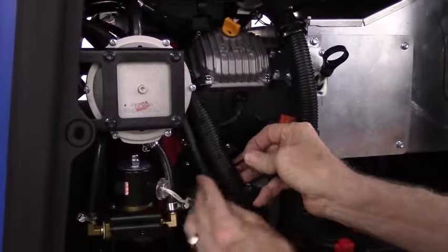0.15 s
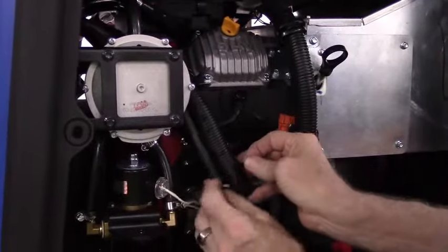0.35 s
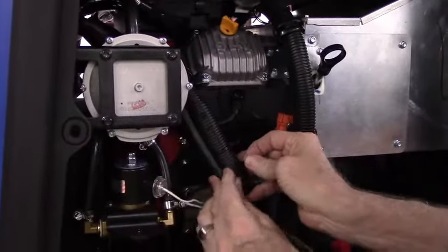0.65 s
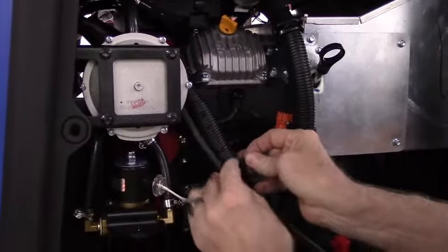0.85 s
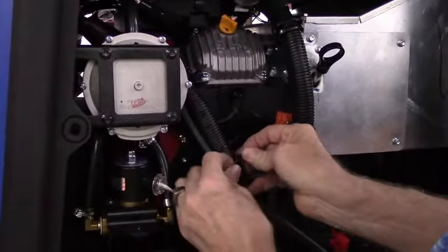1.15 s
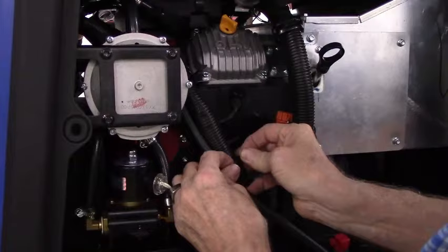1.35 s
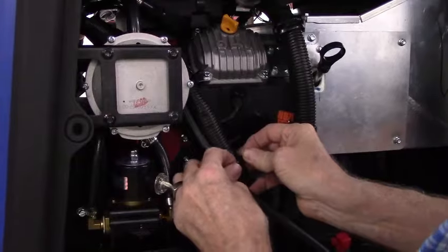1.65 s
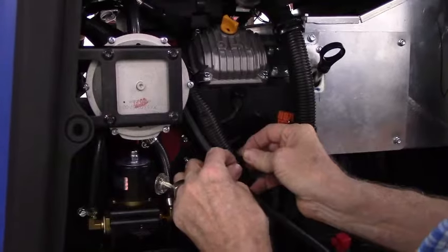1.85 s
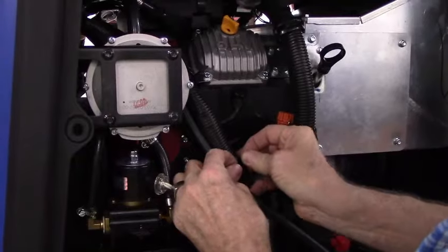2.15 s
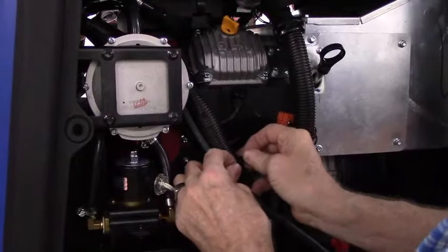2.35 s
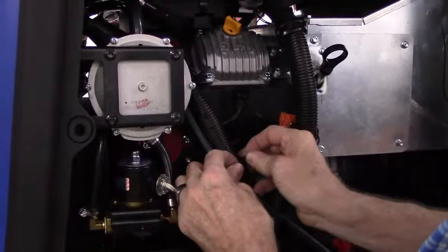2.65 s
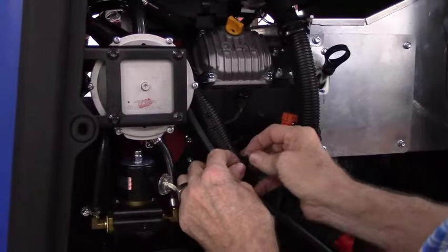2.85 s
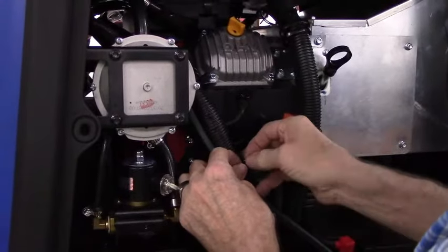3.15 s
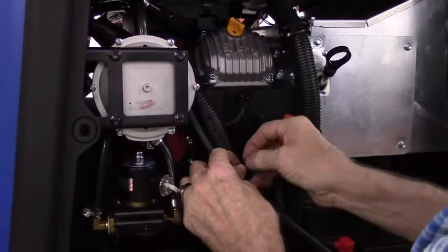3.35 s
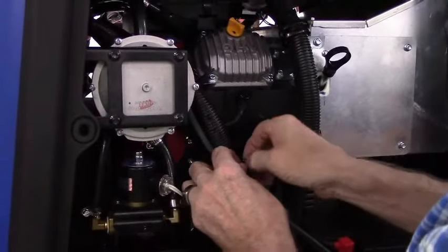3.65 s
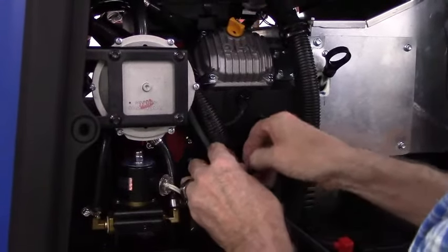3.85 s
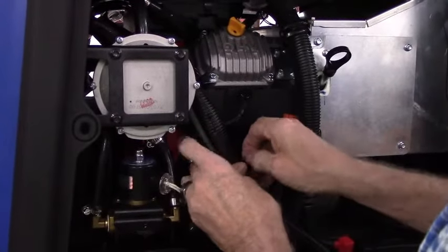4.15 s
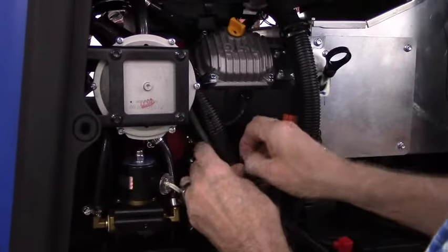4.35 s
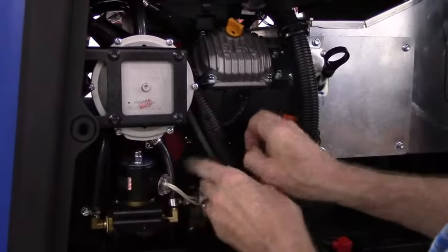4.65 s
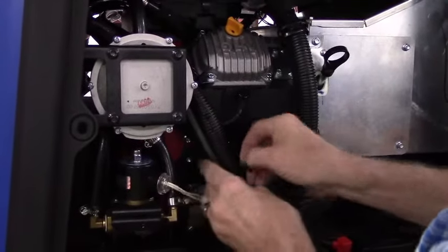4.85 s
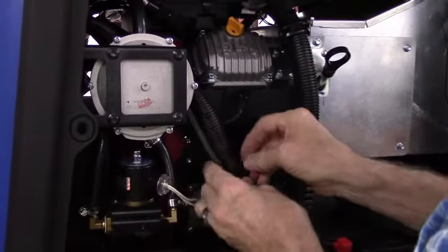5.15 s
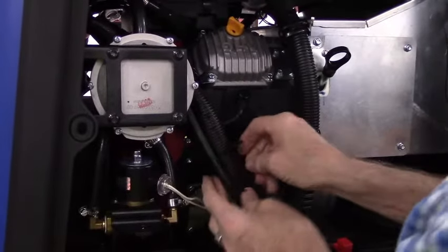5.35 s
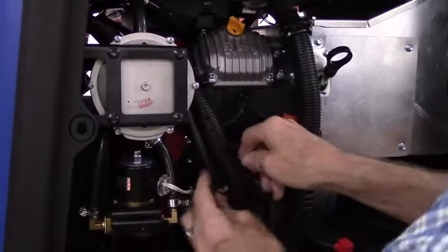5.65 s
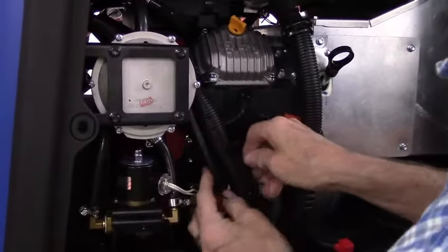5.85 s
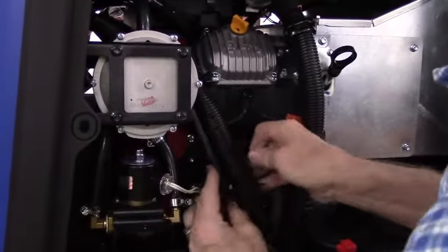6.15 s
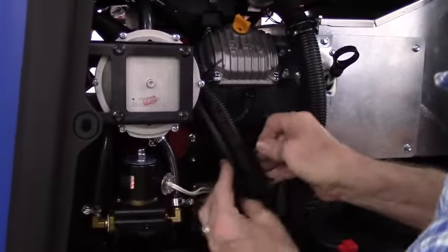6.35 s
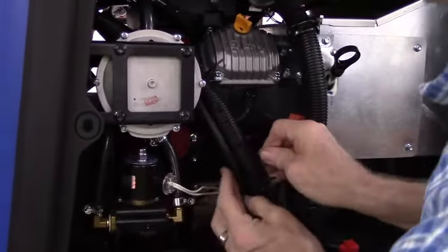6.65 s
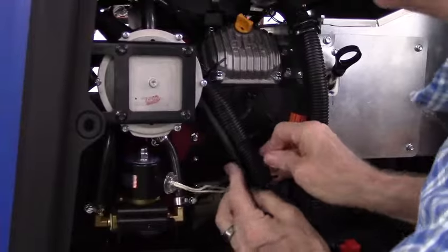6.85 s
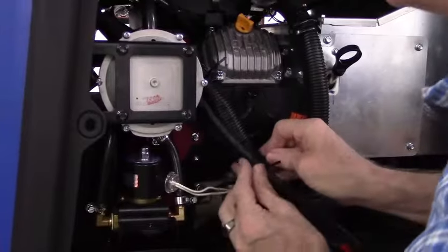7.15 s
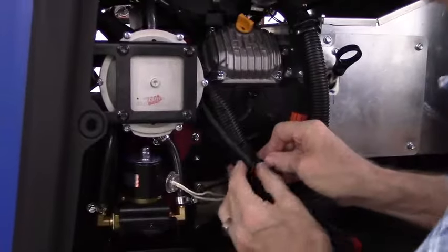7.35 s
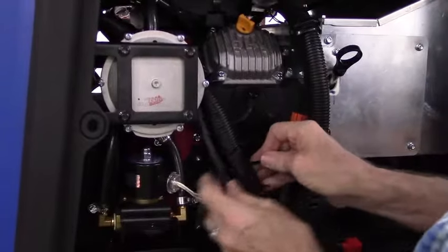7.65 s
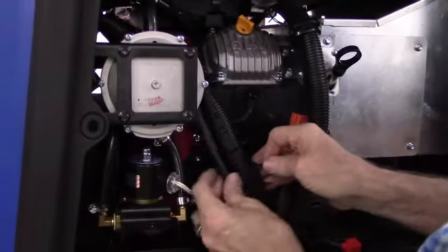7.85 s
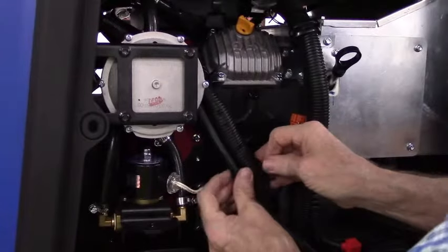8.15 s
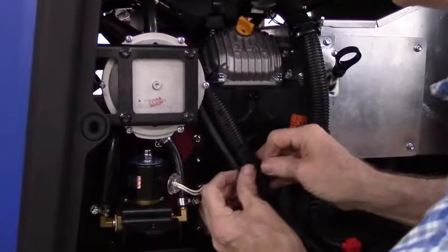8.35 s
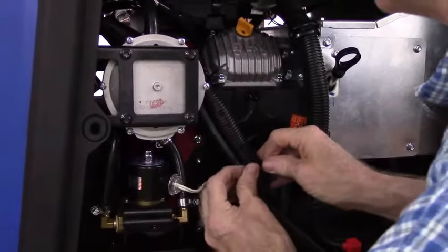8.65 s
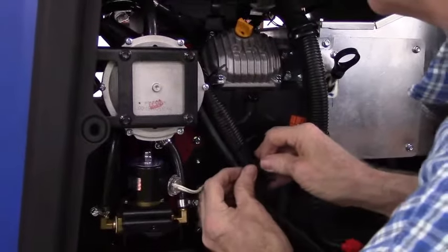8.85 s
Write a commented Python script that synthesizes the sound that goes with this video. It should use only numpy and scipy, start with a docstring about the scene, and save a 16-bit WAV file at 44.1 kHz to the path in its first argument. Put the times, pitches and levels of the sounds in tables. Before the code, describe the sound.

Close handling of thin toothed plastic: sharp snaps, sparse small clicks, then a busy flurry of knocks, scratchy scuffs and falling hose thumps.

```python
"""In a quiet workshop, two hands thread nylon zip ties round a ribbed hose and wiring in an engine bay.
The stiff strap snaps, ticks and knocks: short noise bursts and fading tones. Its pulls and scuffs are
filtered stick-slip noise. The knocked hose answers with a thump whose low waves arrive last, so it
falls in pitch. Sounds are close and nearly mono, with a short echo, steady air and a faint high whine."""
import sys
import numpy as np
from scipy import signal
from scipy.fft import rfft, irfft, next_fast_len
from scipy.io import wavfile

SR = 44100
rng = np.random.default_rng(int(sys.argv[2]) if len(sys.argv) > 2 else 0)


def put_to_file(sound):
    """Save the sound as 16-bit audio at rate SR, in the file named by the first command-line argument."""
    columns = np.atleast_2d(sound).T  # one column per channel
    safe = np.clip(columns, -1, 1)
    whole_steps = np.round(safe * 32767)
    wavfile.write(sys.argv[1], SR, whole_steps.astype(np.int16))


N = 397341
TIME = np.arange(N) / SR   # seconds

# In all tables of events and ringing parts, levels come before any gain set in the functions.
# Steady room noise: pitch_hz, relative level_db
AIR_SPECTRUM = [(15, -34), (25, -32), (72, -12.5), (223, -1.5), (326, -3), (363, -3.5), (695, -7.5),
                (1160, -13), (1440, -13), (1650, -15), (2990, -19.5), (3340, -20), (5730, -23.5),
                (6380, -23.5), (16000, -37)]
# Stereo width of that noise: pitch_hz, side_against_mid_db
AIR_WIDTH = [(30, 1), (70, -4), (130, -7.5), (500, -4), (1500, -5), (6000, -9.5), (12000, -25)]
# The workshop's echo: pitch_hz, time_to_fall_60_db_s, level_db
ROOM_ECHO = [(150, 0.64, -2), (297, 0.59, -9.5), (666, 0.35, -8), (1250, 0.079, -17), (3150, 0.69, -13.5),
             (7160, 0.23, -18), (14000, 0.22, -39)]
# Hands bump the hose softly: peak_s, level_db, pitch_hz
HOSE_BUMPS = [(2.166, -50, 250), (2.216, -44.5, 244), (5.526, -42.5, 220), (5.565, -40.5, 255),
              (5.598, -44, 142), (6.015, -39, 240), (6.441, -45, 208), (6.857, -47, 245), (7.049, -46, 285),
              (7.085, -52, 135), (7.169, -47.5, 522)]
# The hose is plucked: start_s, level_db, contact_db, rib_rattle_db (the last two relative to the pluck)
HOSE_PLUCKS = [(4.7161, -21.5, -29, -26), (5.3086, -22.5, -29, -20), (7.6625, -15.5, -9, -13)]
# Bending waves of the hose, low ones later: middle pitch_hz, level_db, arrival_s, rise_s (peak after two)
HOSE_WAVES = [(1040, -1, 0.00042, 0.00043), (1450, -22, 0.00019, 0.00094), (714, 0.5, 0.00367, 0.0012),
              (515, -4.5, 0.00471, 0.0019), (332, -6.5, 0.00777, 0.0039), (252, -3, 0.00907, 0.0065),
              (199, -21, 0.0095, 0.016)]
# The taut strap hums as it drags: time_s, level_db
DRAG_LEVEL = [(0, -37), (.024, -47), (.04, -74), (.15, -70), (.18, -48), (.21, -54), (.25, -64), (.42, -78),
              (.5, -100)]
# Teeth chatter over an edge and ring the taut strap:
# start_s, length_s, level_db, average teeth_per_s, ring_hz
TOOTH_CHATTERS = [(.165, .05, -60.5, 140, 2720), (0.271, 0.08, -61, 71, 2800), (.28, .07, -68, 170, 3380),
                  (1.026, 0.076, -62.5, 114, 1760), (3.253, 0.043, -50.5, 350, 1810),
                  (3.608, 0.039, -51, 300, 1580), (4.598, 0.089, -56, 450, 3770),
                  (4.676, .045, -57, 700, 8000), (5.687, 0.052, -49, 250, 1450)]
# The strap is pulled harder and harder, then stops: start_s, length_s, rib_rasp_db, tooth_hiss_db, edge_bite_db
STRAP_PULLS = [(0, 0.053, -47.5, -45.5, -51), (.11, 0.12, -54, -57, -67), (.245, 0.069, -57, -53.5, -62),
               (.315, 0.11, -58, -56.5, -67), (2.15, 0.082, -56, -61, -56.5), (3.125, 0.026, -55, -62, -58),
               (3.21, 0.032, -53, -57, -59), (3.238, 0.033, -46, -47.5, -58),
               (3.345, 0.18, -58.5, -60.5, -63), (4.42, 0.078, -61, -64, -65),
               (4.675, 0.049, -62, -46, -64), (4.88, 0.04, -49, -52, -58), (4.975, 0.021, -54, -49.5, -52),
               (5.135, 0.13, -51, -61.5, -63), (5.237, 0.0087, -64, -57, -55),
               (5.298, 0.0074, -39.5, -56, -61), (5.46, 0.056, -51, -51, -59),
               (5.578, 0.022, -52, -54, -56), (5.686, 0.02, -46.5, -59, -55), (5.808, 0.049, -53, -55, -68),
               (6.33, 0.12, -52.5, -49.5, -59), (6.848, 0.038, -49, -56.5, -60),
               (6.985, 0.044, -50.5, -57, -60), (7.155, 0.025, -62, -54, -57), (7.28, 0.11, -62, -63, -67),
               (7.435, 0.08, -62, -58.5, -64), (7.555, 0.096, -49.5, -59.5, -73),
               (7.715, 0.078, -52, -57.5, -70), (7.885, 0.078, -55.5, -68, -62)]
# A finger or the strap's tail skids off and comes to rest:
# start_s, length_s, rib_rasp_db, tooth_hiss_db, edge_bite_db
STRAP_SCUFFS = [(.035, 0.58, -48, -62.5, -53.5), (.42, 0.2, -52.5, -60, -61), (1.02, 0.25, -54, -63, -63),
                (2.228, 0.076, -49, -60, -56), (3.28, 0.071, -46.5, -54, -58),
                (3.602, 0.087, -45.5, -47.5, -51), (3.634, 0.33, -52.5, -62.5, -60),
                (3.796, 0.17, -53.5, -57.5, -62), (4.59, 0.43, -42, -52.5, -56),
                (4.777, 0.065, -37, -43.5, -44), (5.066, 0.065, -55, -60, -65),
                (5.365, 0.27, -53.5, -60.5, -64), (5.52, 0.22, -52.5, -59.5, -65),
                (5.65, 0.055, -66, -72, -63), (5.735, 0.57, -53.5, -66, -64),
                (5.96, 0.12, -44.5, -55, -52.5), (6.2, 0.28, -53.5, -58, -58),
                (6.455, 0.097, -50, -53.5, -70), (7.8, 0.18, -50.5, -60, -68),
                (8.018, 0.055, -44, -56, -49)]
# Sound colour of the ribs, the teeth and the scraping, resonating edge: pitch_hz, relative level_db
RIB_COLOUR = [(50, -50), (300, -3.5), (700, -4.5), (950, 4), (1300, 6.5), (1900, -6), (2350, -5.5),
              (3100, -10), (3700, -15), (4400, -20), (7000, -49)]
TOOTH_COLOUR = [(100, -66), (2000, -16), (3500, -3.5), (5000, -3), (6500, 2), (8000, 0), (10500, -4),
                (13000, -11.5), (16000, -22)]
EDGE_COLOUR = [(600, -54), (1500, -29), (1820, 7.5), (2350, -10), (2750, 1), (3250, -2), (4000, -33),
               (7000, -45)]
# Ringing tones of sleeve, pawl and strap, before the variation of each hit:
# pitch_hz, level_db, time_to_fall_60_db_s
SLEEVE_MODES = [(866, -2, 0.014), (973, 3.5, 0.0087), (1270, 0, 0.017), (1445, -5.5, 0.029),
                (1837, -8, 0.047), (2000, -4, 0.018), (2820, -6.5, 0.036), (3250, -1.5, 0.025),
                (3580, 2, 0.0069), (5890, -1, 0.027), (7600, 13.5, 0.0053), (9140, 0.5, 0.013)]
PAWL_MODES = [(1010, -3, 0.0085), (1200, 3.5, 0.0044), (1780, 0.5, 0.0063), (1930, -5, 0.018),
              (2760, -9, 0.01), (2940, 3.5, 0.01), (3400, 1, 0.0044), (5270, -6, 0.0096),
              (6180, 4.5, 0.0026), (7600, 2, 0.015), (10200, -6, 0.0066)]
STRAP_MODES = [(868, 8, 0.025), (1054, 8.5, 0.018), (1650, 9.5, 0.0097), (2260, 3, 0.016),
               (2600, 0.5, 0.017), (3670, -0.5, 0.0065), (4560, -4.5, 0.012), (5940, -1.5, 0.0062),
               (7230, -5, 0.0098), (9170, -10, 0.013), (10900, -13, 0.011)]
# The tie's head and teeth knock on the ribbed sleeve: start_s, body_db, edge_db, crack_db
SLEEVE_KNOCKS = [(0.8072, -53, -52, -80), (1.3734, -49, -56, -71), (2.157, -48, -56, -60),
                 (2.1955, -46, -47.5, -55), (2.2165, -43, -44, -53), (2.2215, -50, -46, -57),
                 (3.144, -54, -54, -65), (3.488, -46, -62, -73), (3.602, -44, -41, -52),
                 (2.9812, -49.5, -69, -73), (3.4681, -49, -48, -51), (3.508, -49, -49, -52.5),
                 (3.7724, -60, -55, -56), (3.7954, -44.5, -53, -57), (4.0598, -48.5, -67, -67),
                 (4.1865, -50.5, -60, -65), (4.5807, -26.5, -29, -38), (4.5858, -17, -18, -23),
                 (4.5912, -34, -28, -44), (4.6595, -48, -50, -44), (4.6622, -33, -51, -52),
                 (4.6685, -44, -56, -60), (4.7707, -28, -47, -46), (4.805, -37.5, -49, -47),
                 (5.068, -55, -49.5, -61), (5.1638, -48, -52, -58), (5.3603, -37, -40, -50.5),
                 (5.515, -36.5, -47.5, -48), (5.5855, -42, -58, -63), (5.6078, -45, -49, -44.5),
                 (5.624, -40.5, -58, -66), (5.639, -44, -48, -66), (5.6901, -53, -45, -58),
                 (5.703, -50, -48, -71), (5.7272, -36, -43.5, -47.5), (5.8115, -43, -63, -66),
                 (5.8198, -37, -55, -64), (5.8248, -36, -55, -55), (5.8315, -32.5, -54, -53),
                 (5.9046, -45, -56, -51), (6.3215, -48.5, -57, -77), (6.5466, -46, -42.5, -60),
                 (6.7721, -41.5, -54, -60), (7.0116, -49, -55, -42), (7.7385, -54, -50, -69),
                 (7.8045, -44, -68, -65), (7.915, -49, -56, -52), (8.4468, -52, -52.5, -55.5),
                 (8.4762, -54, -51.5, -56)]
# Teeth skip past the tie's pawl: start_s, body_db, edge_db, crack_db, free_length_hz
PAWL_TICKS = [(1.0072, -65, -45.5, -42.5, 5850), (1.031, -67, -59, -66, 3140),
              (1.1409, -74, -77, -52, 8000), (2.1668, -58, -50, -59, 2940), (3.74, -51, -63, -57, 6870),
              (3.811, -62, -67, -58, 5700), (4.023, -70, -75, -60.5, 8060), (4.4265, -73, -59.5, -62, 6060),
              (4.5437, -66, -70, -54.5, 8580), (4.849, -64, -71, -59, 7400), (4.9685, -59, -66, -60, 4760),
              (5.425, -68, -66, -61, 7000), (5.8445, -60, -68, -49, 7400), (6.2555, -50, -55, -54, 2530),
              (4.781, -56, -39, -47, 3430), (5.9575, -58, -43, -50.5, 6840), (5.961, -58, -53, -45.5, 3300),
              (6.2024, -70, -78, -53, 6800), (6.27, -60, -60, -49.5, 7100), (7.2031, -62, -52, -53, 2300),
              (7.3054, -57, -62, -46, 7360), (7.3418, -72, -69, -53, 9920), (7.3673, -42, -33, -39, 2700),
              (7.4945, -64, -60, -53, 2420), (7.637, -70, -68, -50.5, 8000), (4.7965, -39, -53, -48, 7200),
              (4.931, -65, -46.5, -59, 3000), (4.9925, -60, -51, -53.5, 7500), (5.248, -61, -52, -58, 4600),
              (8.6843, -76, -52.5, -55.5, 1890)]
# The strap flicks free: start_s, body_db, edge_db, crack_db, free_length_hz
STRAP_SNAPS = [(0.0256, -23, -14.5, -34.5, 1730), (0.2355, -46, -60, -66, 900),
               (0.4136, -21.5, -21.5, -27.5, 886), (0.7024, -56, -50.5, -57, 2160),
               (1.1803, -49, -51.5, -53.5, 1130), (1.8346, -44.5, -40.5, -38, 1880),
               (2.1356, -42.5, -57, -52, 990), (2.5771, -51, -53, -63, 1220),
               (2.821, -41, -48, -42.5, 1260), (3.0371, -43, -62, -65, 930),
               (3.0412, -47.5, -54, -60, 1410), (3.2441, -38.5, -52, -43, 1770),
               (3.6073, -40, -44, -50, 1390), (5.6482, -33.5, -52, -62, 895),
               (6.6673, -43.5, -50, -59, 1500), (7.953, -68, -45, -54, 2350),
               (8.0158, -52, -42.5, -44.5, 1410)]

AIR_DB = -59.5   # middle channel
WHINE_HZ, WHINE_DB = 5500, -77
WHINE_PULSES_PER_S, WHINE_FIRST_S = 7.465, .065   # middle of an early pulse
BODY_TOP_HZ, EDGE_TOP_HZ = 1400, 4500   # limits between a click's body, edge and crack
LIGHT_DAMPING = .45   # share of its ring time left to a part that the fingers still hold
SWELL_DB = 4   # a pull's growth from start to end, on top of getting up to speed
GRAB_SHARE, STOP_S = 0.16, 0.0081   # share of a pull spent getting up to speed; fade time of its stop
SKID_S, SKID_LOSS_DB = 0.0011, 20.5   # a scuff's attack, and its loss over its length
# Fingers never lie quite still, and rub more while the hands shift along the hose.
RESTING_RIB_DB, RESTING_TOOTH_DB, RESTING_EDGE_DB = -74, -79.5, -87   # outside the busy stretch
BUSY_FROM_S, BUSY_TO_S, BUSY_DB = 4.42, 8.08, 9.5
CUTOFF_HZ = 16200


def from_db(db):
    """Turn decibels into a plain multiplier."""
    return 10 ** (np.asarray(db) / 20)


def rms_one(x):
    """Scale a sound to an average (rms) level of one."""
    return x / np.sqrt(np.mean(x ** 2) + 1e-20)


def unit_energy(x):
    """Scale a short sound so that its squares add up to one."""
    return x / np.sqrt(np.sum(x ** 2) + 1e-20)


def at_hz(points, hz, column=1):
    """Read a table column between its points, on a log-frequency axis."""
    points = np.array(points)
    return np.interp(np.log(np.maximum(hz, 1)), np.log(points[:, 0]), points[:, column])


def band(x, hz, kind="band", order=2):
    """Keep only part of the spectrum."""
    return signal.sosfilt(signal.butter(order, hz, kind, fs=SR, output="sos"), x)


def colour(x, points):
    """Shape the spectrum of a steady sound with a table."""
    size = next_fast_len(N)
    gain = from_db(at_hz(points, np.fft.rfftfreq(size, 1 / SR)))
    return irfft(rfft(x, size) * gain, size)[:N]


def add(out, s, sound):
    """Mix a short sound in at time s."""
    start = max(round(s * SR), 0)
    out[start:start + len(sound)] += sound[:N - start]


def fading(x, fade_s):
    """Let every pulse in x die away smoothly."""
    return signal.lfilter([1], [1, -np.exp(-1 / (fade_s * SR))], x + 1e-18)


def room_air():
    """Steady ventilation noise, widest in the bass, and a thin electrical whine that pulses on and off."""
    mid, side = (from_db(AIR_DB) * rms_one(colour(white, AIR_SPECTRUM))
                 for white in rng.standard_normal((2, N)))
    pulse_phase = 2 * np.pi * WHINE_PULSES_PER_S * (TIME - WHINE_FIRST_S)
    on = np.clip(.5 + 2 * np.cos(pulse_phase), 0, 1)
    whine = on * from_db(WHINE_DB) * np.sqrt(2) * np.sin(2 * np.pi * WHINE_HZ * TIME)
    return mid + whine + colour(side, AIR_WIDTH) * [[1], [-1]]


def workshop_echo(x, build_s=0.0006):
    """A diffuse tail of fading noise that builds up quickly, each octave dying at its own rate."""
    t, tail = TIME[:SR * 3 // 4], 0
    for hz in 125 * 2. ** np.arange(8):
        octave = [hz / np.sqrt(2), min(hz * np.sqrt(2), SR * 4 / 9)]
        noise = band(rng.standard_normal(len(t)), octave)
        build_up = 1 - np.exp(-(t / build_s) ** 2)
        fade = unit_energy(from_db(-60 * t / at_hz(ROOM_ECHO, hz)) * build_up)
        tail = tail + noise * fade * from_db(at_hz(ROOM_ECHO, hz, column=2))
    return signal.fftconvolve(x, tail)[:N]


def hose_bumps(rise_s=0.00408, skin_db=-9, gain_db=22):
    """Soft skin on rubber gives a short dull thud, pitched by where the hose is held."""
    out, t = np.zeros(N), TIME[:SR // 8]
    for peak_s, bump_db, hz in HOSE_BUMPS:
        skin = rms_one(band(rng.standard_normal(len(t)), [hz / 2, hz * 2]))
        tone = np.sin(2 * np.pi * hz * t)
        thud = (tone + from_db(skin_db) * skin) * t ** 2 * np.exp(-t / rise_s)
        add(out, peak_s - 2 * rise_s, from_db(bump_db + gain_db) * unit_energy(thud))
    return out


def rib_rattle(t, per_s=110, decay_s=0.084, tap_s=0.0018):
    """The swinging hose taps its ribs against the wiring, unevenly and ever more weakly."""
    taps = (rng.random(len(t)) < per_s / SR) * rng.uniform(0.47, 1, len(t))
    bursts = fading(taps, tap_s) * np.exp(-t / decay_s) * rng.standard_normal(len(t))
    return unit_energy(band(bursts, [520, 1700]))


def hose_wave(t, hz, arrival_s, rise_s, broken=0.52):
    """One bending wave swells and fades; ribs rubbing on the wiring break it up."""
    age = np.maximum(t - arrival_s, 0)
    varied_hz = hz * (1 + 0.045 * rng.standard_normal())
    wave = age ** 2 * np.exp(-age / rise_s) * np.sin(2 * np.pi * varied_hz * age)
    rub = rms_one(band(rng.standard_normal(len(t)), [hz / 20, hz / 4]))
    return unit_energy(band(wave * (1 + broken * rub), hz / 2, "high", order=3))


def hose_plucks(grit_s=0.018, grit_db=-7, contact_s=0.0027, gain_db=14):
    """A sharp contact sends waves along the hose; the slow low ones come last, while the ribs rattle."""
    out, t = np.zeros(N), TIME[:SR // 6]
    for s, pluck_db, contact_db, rattle_db in HOSE_PLUCKS:
        grit, touch = rng.standard_normal((2, len(t)))
        contact = band(touch * np.exp(-t / contact_s), [750, 2500], order=3)
        grit = band(grit * np.sqrt(t) * np.exp(-t / grit_s), [230, 1300], order=3)
        pluck = from_db(contact_db) * unit_energy(contact) + from_db(grit_db) * unit_energy(grit)
        pluck += from_db(rattle_db) * rib_rattle(t)
        for hz, wave_db, arrival_s, rise_s in HOSE_WAVES:
            pluck += from_db(wave_db) * hose_wave(t, hz, arrival_s, rise_s)
        add(out, s, from_db(pluck_db + gain_db) * pluck)
    return out


def stick_slip(per_s, uneven_db, smooth_db):
    """Stick and slip: tiny uneven catches over smooth friction."""
    sizes = from_db(uneven_db * np.minimum(rng.exponential(1, N), 3)) * rng.choice([-1, 1], N)
    catches = sizes * (rng.random(N) < per_s / SR)
    return rms_one(catches) + from_db(smooth_db) * rng.standard_normal(N)


def strap_hum(hz=900, width_hz=110):
    """Friction keeps the strap's lowest mode ringing."""
    friction = stick_slip(per_s=910, uneven_db=1.0, smooth_db=13)
    ring = band(friction, [hz - width_hz / 2, hz + width_hz / 2])
    return from_db(np.interp(TIME, *np.transpose(DRAG_LEVEL))) * rms_one(ring)


def chatter(uneven_db=3.0, width_share=0.073, tooth_s=0.00031):
    """Tooth after tooth lets go, at an unsteady pace and with uneven strength, ringing the strap."""
    out = np.zeros(N)
    for s, length, level_db, per_s, hz in TOOTH_CHATTERS:
        samples, run = int(length * SR), np.zeros(SR // 4)
        gaps = rng.uniform(.5, 1.5, 100)
        sizes = from_db(uneven_db * rng.standard_normal(100))
        release_s = np.cumsum(gaps) / per_s
        inside = release_s < length
        run[(release_s[inside] * SR).astype(int)] = sizes[inside]
        run = fading(run, tooth_s) * rng.standard_normal(len(run))
        ring = band(run, [hz * (1 - width_share / 2), hz * (1 + width_share / 2)], order=1)
        ring = band(ring, [hz / 2, hz * 2])
        add(out, s, from_db(level_db) * np.sqrt(samples) * unit_energy(ring))
    return out


def grip(per_s, depth_db):
    """Finger pressure changes in small jerks."""
    jerks = rng.standard_normal(4000)
    return from_db(depth_db * np.interp(TIME * per_s, np.arange(len(jerks)), jerks))


def snags(per_s=50, uneven_db=-14.5, length_s=0.0016):
    """Now and then a single tooth catches, each with its own strength, and gives a short noise burst."""
    sizes = from_db(uneven_db * np.minimum(rng.exponential(1, N), 2))
    catches = sizes * (rng.random(N) < per_s / SR)
    return rms_one(fading(catches, length_s) * rng.standard_normal(N))


def pull_shape(t, length):
    """A pull gets up to speed, swells and stops short."""
    speed = np.minimum(t / (GRAB_SHARE * length), 1) * np.exp(-np.maximum(t - length, 0) / STOP_S)
    return speed * from_db(SWELL_DB * np.minimum(t / length - 1, 0))


def scuff_shape(t, length):
    """A scuff starts almost at once and dies away."""
    return np.minimum(t / SKID_S, 1) * from_db(-SKID_LOSS_DB * t / length)


def strokes():
    """Levels of rib rasp, tooth hiss and edge bite; the powers of overlapping strokes add up."""
    busy = (TIME > BUSY_FROM_S) & (TIME < BUSY_TO_S)
    resting = from_db([[RESTING_RIB_DB], [RESTING_TOOTH_DB], [RESTING_EDGE_DB]])
    power = (resting * from_db(BUSY_DB * busy)) ** 2
    t = TIME[:SR // 2]
    for table, shape in ((STRAP_PULLS, pull_shape), (STRAP_SCUFFS, scuff_shape)):
        for s, length, *levels_db in table:
            for layer, level_db in zip(power, levels_db):
                add(layer, s, (from_db(level_db) * shape(t, length)) ** 2)
    return np.sqrt(power)


def rasp(rib_gain_db=-0.85, tooth_gain_db=-1.5, shared=0.9, snag_db=-8):
    """The sliding strap shakes the sleeve's ribs, hisses with its much finer teeth, and scrapes with its edge."""
    ribs, teeth, edge = strokes()
    pressure = grip(per_s=130, depth_db=2.3)
    coarse = stick_slip(per_s=450, uneven_db=-0.5, smooth_db=2) + from_db(snag_db) * snags()
    # the teeth feel the ribs' catches too
    fine = shared * coarse + from_db(snag_db) * snags(per_s=59, length_s=0.0012)
    fine += stick_slip(per_s=4400, uneven_db=6.5, smooth_db=5.5)
    scrape = stick_slip(per_s=600, uneven_db=1.5, smooth_db=-4)
    low = from_db(rib_gain_db) * ribs * rms_one(colour(coarse * pressure, RIB_COLOUR))
    high = from_db(tooth_gain_db) * teeth * rms_one(colour(fine * pressure, TOOTH_COLOUR))
    bite = edge * rms_one(colour(scrape * pressure, EDGE_COLOUR))
    return low + high + bite


def clicks(table, modes, crack_db, crack_s, rattle_db, rattle_s, low_hz, gain_db, free_db=0, free_cycles=1):
    """A sharp release rings the modes and any free strap; the grip sets each band's level (rms over 5 ms)."""
    out, t = np.zeros(N), TIME[:SR // 20]
    hz, mode_db, t60 = np.array(modes).T[:, :, None]
    sign = (-1) ** np.arange(len(modes))[:, None]
    for s, body_db, edge_db, high_db, *free_hz in table:
        # hard hits are clean and alike; light touches vary, skid and are damped
        loose = np.interp(max(body_db, edge_db), [-50, -25], [1, .2])
        detune, strength = loose * rng.standard_normal((2, len(modes), 1))
        grit, scatter = rng.standard_normal((2, len(t)))
        damping = np.interp(loose, [.2, 1], [1, LIGHT_DAMPING])
        fade = from_db(mode_db + 4.5 * strength - 60 * t / (t60 * damping))
        tones = np.sin(2 * np.pi * hz * (1 + 0.03 * detune) * t)
        ring = (sign * fade * tones).sum(0)
        ring += from_db(crack_db) * band(grit, [5200, 12500]) * np.exp(-t / crack_s)
        for f in free_hz:
            # free_cycles: swings until an undamped ring has lost 60 dB
            free = np.sin(2 * np.pi * f * t) * from_db(-60 * f * t / (free_cycles * damping))
            ring = unit_energy(ring) + from_db(free_db) * unit_energy(free)
        # nearby metal parts throw the click back within milliseconds
        reflections = unit_energy(scatter * t * np.exp(-t / rattle_s))
        ring += loose * from_db(rattle_db) * signal.fftconvolve(ring, reflections)[:len(t)]
        # such small parts radiate no bass
        ring = band(ring, low_hz, "high", order=3)
        body = unit_energy(band(ring, BODY_TOP_HZ, "low", order=5))
        edge = unit_energy(band(ring, [BODY_TOP_HZ, EDGE_TOP_HZ], order=4))
        crack = unit_energy(band(ring, EDGE_TOP_HZ, "high", order=4))
        click = from_db(body_db) * body + from_db(edge_db) * edge + from_db(high_db) * crack
        add(out, s, from_db(gain_db) * np.sqrt(SR / 200) * click)   # SR / 200 samples are 5 ms
    return out


def sleeve_knocks():
    """The tie's head and teeth strike the ribbed sleeve and ring its modes."""
    return clicks(SLEEVE_KNOCKS, SLEEVE_MODES, crack_db=8.0, crack_s=0.004, rattle_db=-0.5,
                  rattle_s=0.0017, low_hz=358, gain_db=-4.0)


def pawl_ticks():
    """Teeth skip past the pawl, ringing it and the free length of strap."""
    return clicks(PAWL_TICKS, PAWL_MODES, crack_db=4.0, crack_s=0.00082, rattle_db=-2,
                  rattle_s=0.0014, low_hz=604, gain_db=0.0, free_db=-4, free_cycles=36)


def strap_snaps():
    """The stiff strap flicks free, ringing its modes and its free length."""
    return clicks(STRAP_SNAPS, STRAP_MODES, crack_db=5.5, crack_s=0.00076, rattle_db=-2.5,
                  rattle_s=0.0023, low_hz=650, gain_db=-3.5, free_db=-7.5, free_cycles=48)


def scene():
    """Close handling in the middle, a narrow room around it."""
    hose = hose_bumps() + hose_plucks()
    sliding = strap_hum() + chatter() + rasp()
    hands = hose + sliding + sleeve_knocks() + pawl_ticks() + strap_snaps()
    # the echo and the direct treble reach the two capsules slightly differently
    side = from_db(-18.0) * workshop_echo(hands) + from_db(-37) * np.gradient(hands)
    return room_air() + hands + workshop_echo(hands) + side * [[1], [-1]]


def record(dry):
    """The top is cut steeply."""
    return signal.sosfilt(signal.ellip(10, .1, 80, CUTOFF_HZ, fs=SR, output="sos"), dry)


dry = scene()
out = record(dry)
put_to_file(out)
```